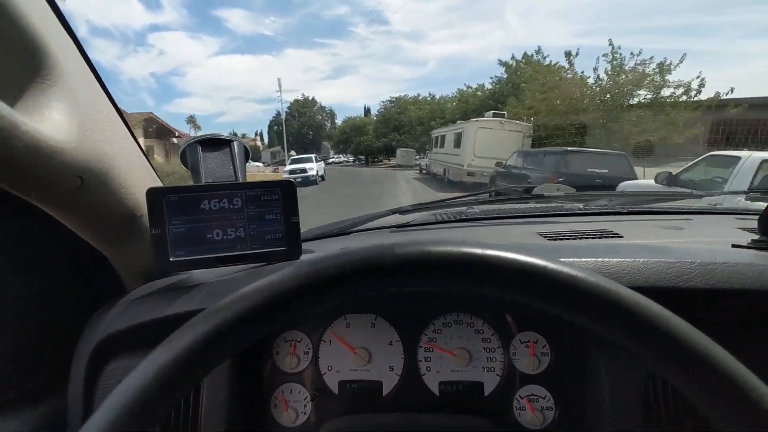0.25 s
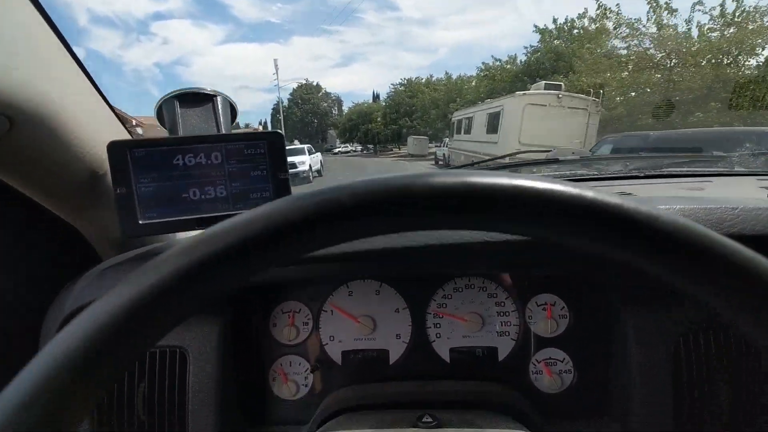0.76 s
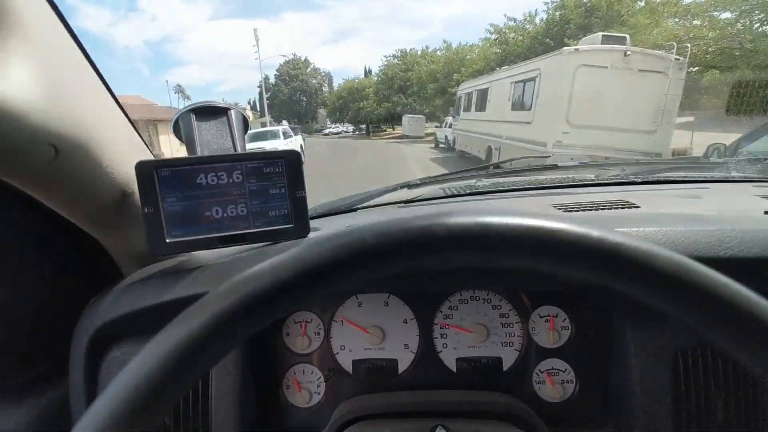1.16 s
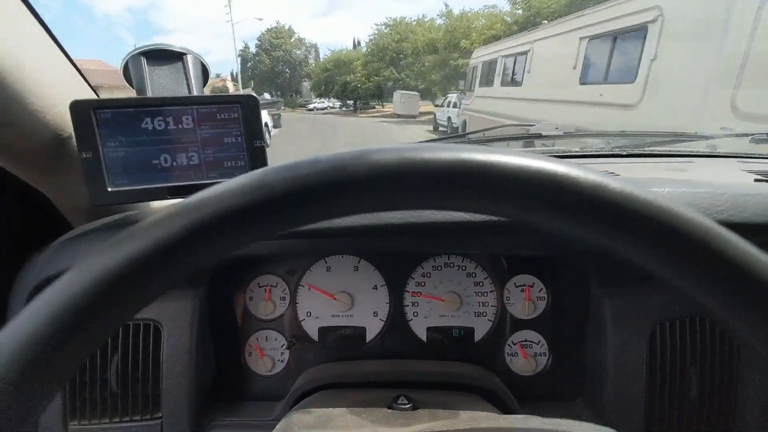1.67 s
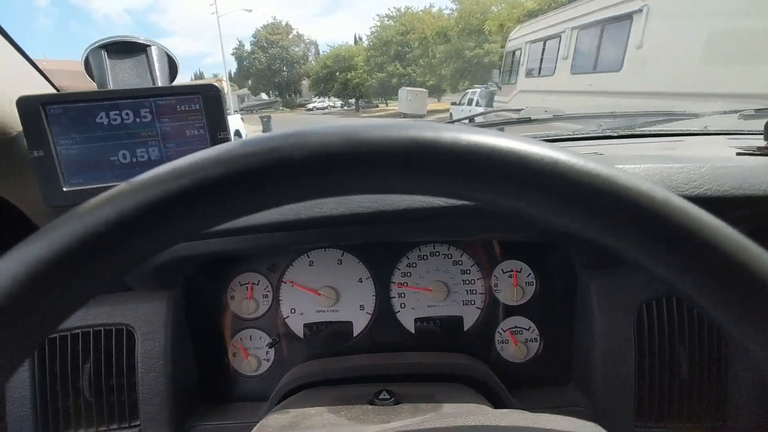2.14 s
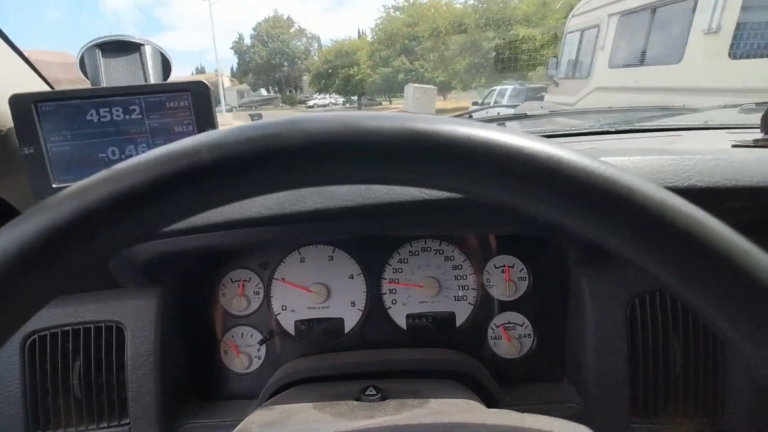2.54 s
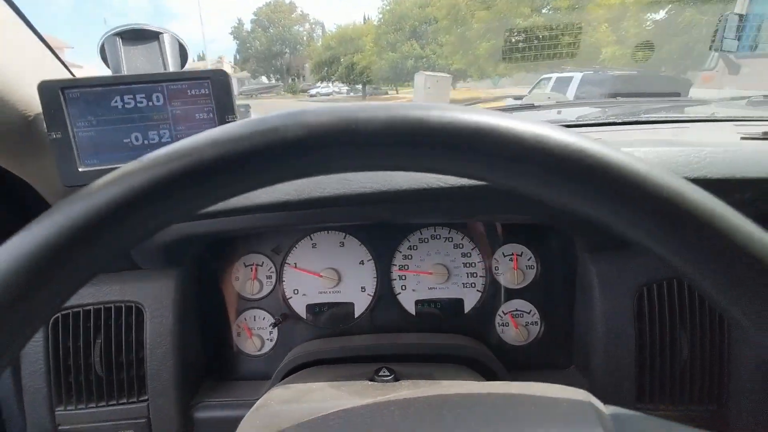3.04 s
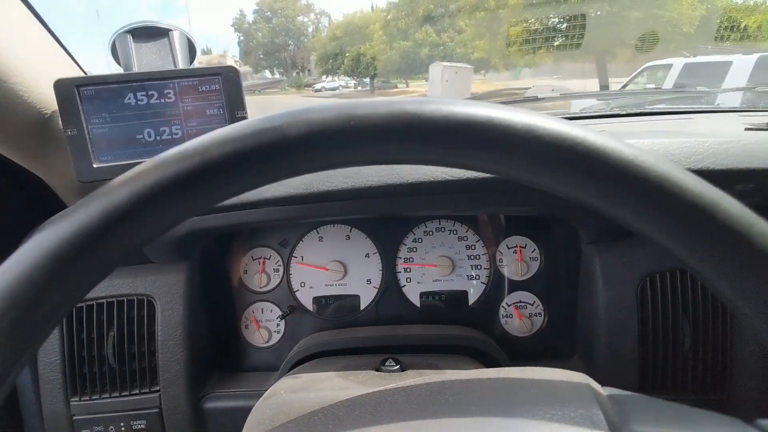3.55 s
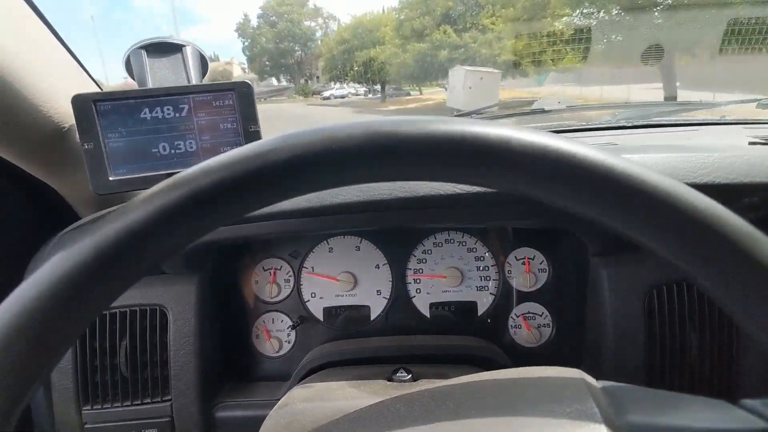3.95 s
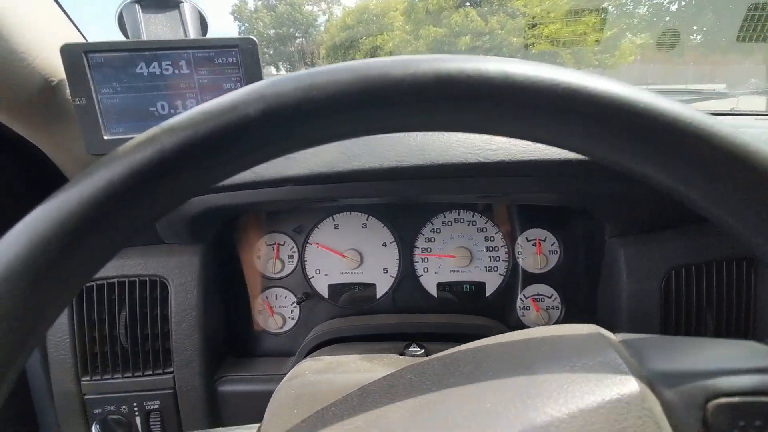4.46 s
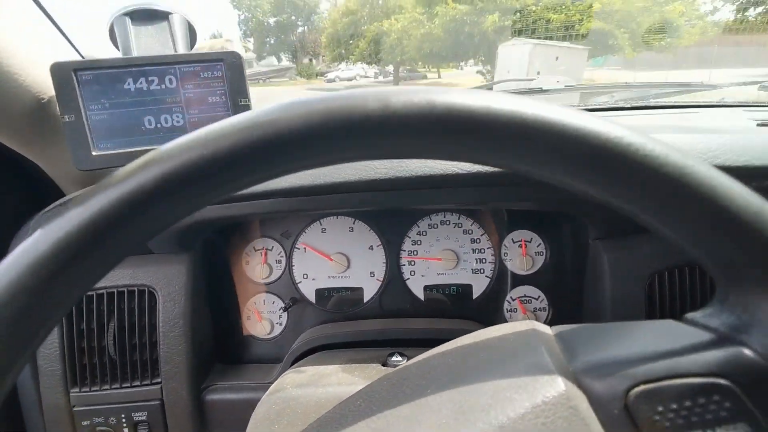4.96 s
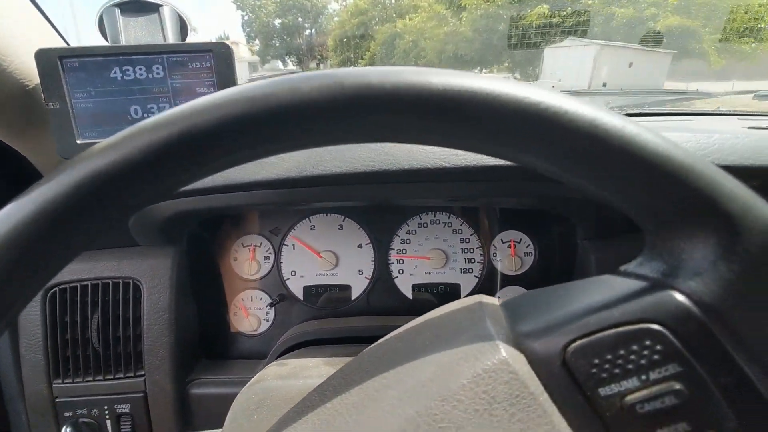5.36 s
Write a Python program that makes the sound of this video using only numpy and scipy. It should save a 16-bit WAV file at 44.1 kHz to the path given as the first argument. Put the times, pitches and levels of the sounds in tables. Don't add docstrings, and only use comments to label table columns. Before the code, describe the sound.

Close, enclosed cabin sound on a phone-like microphone. A six-cylinder diesel growls with a raspy flutter and sinks in pitch under braking, while rough road shakes the floor and loose plastic rattles. After about two seconds a crisp switch click, then a sharp puff of vented air. The drone softens briefly, and the engine picks up again, deeper and rounder, with clatter, rushing air and a thin whistle.

```python
import sys
import numpy as np
from scipy import signal
from scipy.fft import rfft, irfft, next_fast_len
from scipy.io import wavfile
from scipy.ndimage import uniform_filter1d, map_coordinates

SR = 44100
rng = np.random.default_rng(int(sys.argv[2]) if len(sys.argv) > 2 else 0)


def volts_from_decibels(level):
    exponent = np.asarray(level, float) / 20
    return 10 ** exponent


def master(y):
    cut = np.clip(np.atleast_2d(y).T, -1, 1)
    pcm = np.round(cut * 32767)
    wavfile.write(sys.argv[1], SR, pcm.astype(np.int16))


N = 246959

# time_s, firing_hz
FIRING_SPEED = [(0, 68.2), (.6, 62.65), (1, 59.4), (1.2, 56.65), (1.6, 53.2), (2, 52.15), (2.4, 49.25),
                (2.8, 46.6), (2.99, 45.9), (3.2, 42.6), (3.6, 40.7), (3.8, 42.4), (4, 45.2), (4.2, 50.3),
                (4.4, 54), (4.6, 55.9), (5.18, 64.7), (5.6, 68.4)]
# time_s, shut_0_to_1
BRAKE_VALVE = [
    (0, 1),
    (2.99, 1),
    (3.03, .1),
    (3.15, .15),
    (3.28, .45),
    (3.36, 0),
    (5.6, 0),
]
# time_s,
# flow_0_to_1
AIR_FLOW = [(0, .02), (2.4, 0), (2.7, 0.37), (3.2, 0.65), (3.5, 0.86), (4.2, 0.92), (4.9, 0.95),
            (5.1, 0.71), (5.6, 0.71)]
# freq_hz, level_db
PIPE_SHUT = [(30, -55), (70, -38), (100, -38), (130, -38), (160, -24), (180, -21), (200, -25), (225, -42),
             (255, -42), (275, -32), (298, -27), (322, -28), (345, -44), (450, -62)]
# freq_hz, level_db
PIPE_OPEN = [(30, -55), (65, -32), (100, -33), (140, -36), (205, -35), (235, -44), (300, -49), (350, -54),
             (450, -62)]
# freq_hz, lag_rad
PIPE_LAG = [(65, 0), (95, 2.5), (120, 3.1), (160, 2.8), (180, 3.3), (200, 4.3), (250, 7.5), (300, 10),
            (350, 14), (520, 20)]
# centre_hz, half_width_hz, level_db
BOOM_SHUT = [(45, 30, -49), (61.76, 2.86, -21), (85.2, 12.5, -27.5), (133.6, 6.6, -28.5),
             (147.6, 6.7, -26.5), (180.6, 18.6, -20), (264, 45, -35)]
# centre_hz, half_width_hz, level_db
BOOM_OPEN = [(65.05, 4.64, -10), (93.6, 17.8, -22), (126, 3.3, -30.5), (174.4, 19.5, -17), (221, 6.4, -9.5),
             (258, 13, -21)]
FIRING_SHUT_DB = [-0.5, -0.7, 2.4, -6.5]
FIRING_OPEN_DB = [-0.3, 1.8, -4.5, -13.5]
# centre_hz, half_width_hz, level_db
BELT_SHUT = [(280.5, 20, -28.5), (233.5, 18, -34)]
# centre_hz, half_width_hz, level_db
BELT_OPEN = [(181, 4, -36), (238.4, 37, -29)]
# middle_s, half_length_s,
# floor_shake_db, trim_rustle_db
ROUGH_ROAD = [(0.195, 0.68, 6, 1.1), (1.04, 0.16, 8, 6.5), (1.475, 0.22, 10.5, 4.5), (1.812, 0.16, 7.5, 6),
              (2.86, 0.43, 5, 4), (3.293, 0.23, 2.5, -1.1), (3.71, 0.17, 0.5, 4.5), (4.154, .12, 2.5, 3),
              (4.716, 0.52, 7.5, 1.2), (5.35, 0.42, -0.4, -3.5)]
# freq_hz, density_db_per_hz
RUMBLE_COLOUR = [(12, -45), (20, -12.5), (67, 7.5), (114, 0), (185, 12.5), (203, -2), (248, -0.5),
                 (449, -13.5), (500, -22), (650, -57), (1100, -120)]
# freq_hz, density_db_per_hz
CLATTER_COLOUR = [(180, -9.5), (300, -4.5), (458, -13), (505, -4.5), (627, -8), (762, -5), (877, -7.5),
                  (1230, -8), (1910, -28), (2770, -24), (3400, -26), (4000, -25), (5200, -26.5),
                  (8800, -120)]
# freq_hz, density_db_per_hz
HISS_COLOUR = [(880, -47), (1500, -0.5), (1710, -1.5), (2580, -3.5), (3230, -11), (4150, -8.5),
               (5600, -12.5), (6140, -11), (9630, -16.5), (11000, -21.5), (14300, -55), (22000, -120)]
# freq_hz, density_db_per_hz
WINDOW_COLOUR = [(6470, -20), (11000, -8.5), (12700, -8), (15100, -10), (15600, -15.5)]
# time_s, whistle_hz
TURBO_PITCH = [(0, 4420), (3.1, 4390), (3.9, 4610), (4.8, 4910), (5.6, 4980)]
# start_s, level_db, pitch_hz, t60_s
SQUEAKS = [(.228, -62, 12000, .03), (.314, -62, 12000, 0.028), (.803, -47, 11900, .03),
           (1.097, -37, 8300, 0.025), (1.69, -51, 14900, .05), (2.18, -57, 14900, .03),
           (3.466, -81, 9700, 0.034), (3.945, -46, 10200, 0.035)]
# start_s, peak_db, centre_hz, t60_s
KNOCKS = [(.316, -28.5, 900, 0.057), (.805, -22, 1100, 0.023), (.415, -38, 1500, .04),
          (.985, -22.5, 2500, 0.023), (.999, -29, 1090, 0.054), (1.061, -28, 930, 0.055),
          (1.03, -46, 2000, .06), (1.09, -36, 2200, .06), (1.133, -28, 800, 0.05), (1.568, -29, 830, 0.036),
          (2.196, -41, 900, .04), (2.523, -28.5, 2500, 0.023), (2.913, -31, 1540, 0.035),
          (2.97, -34, 880, .1), (3.243, -26.5, 1980, 0.043), (4.984, -42, 700, 0.045),
          (5.489, -39, 700, .05)]
# start_s, peak_db, centre_hz, t60_s
TICKS = [(.985, -39.5, 7360, 0.06), (1.098, -58, 8400, 0.045), (1.435, -52, 6000, 0.017),
         (1.575, -43, 6300, 0.15), (1.69, -40, 6500, 0.045), (1.702, -34.5, 7040, 0.034),
         (1.73, -47, 7000, 0.052), (1.809, -39.5, 11000, 0.038), (2.237, -39.5, 7960, 0.043),
         (2.663, -38.5, 8000, 0.034), (3.207, -34, 7000, 0.045), (3.466, -33.5, 6500, 0.032),
         (3.874, -34, 6500, 0.054), (3.945, -44, 9500, 0.033), (4.13, -40, 9000, 0.044),
         (4.198, -40.5, 9400, 0.046), (5.106, -52, 5030, .03)]
# start_s, level_db, pitch_hz, t60_s
BUMPS = [(1.074, -29, 393, 0.13), (1.271, -29, 384, .15), (1.385, -27, 590, 0.08), (1.425, -14, 64, 0.15),
         (1.53, -26.5, 893, 0.036), (2.789, -29.5, 419, 0.16), (2.958, -22.5, 343, 0.071),
         (4.45, -28, 980, .06), (4.66, -29, 578, 0.15)]
# start_s, level_db
SWITCH_HITS = [
    (2.1222, -20),
    (2.1246, -15.5),
    (2.1285, -30),
    (2.133, -20),
    (2.139, -39),
    (2.143, -35),
]
# freq_hz, level_db, t60_s
SWITCH_MODES = [(770, 0, .035), (1620, -4, .025), (2401, -9, .02), (3090, -10, .02), (4716, -16, .014),
                (7500, -20, .012)]
# start_s, rise_s, hold_s, fall_db_per_s, level_db
VENT_BURSTS = [
    [(2.822, 0.013, 0.11, 112, -42.5), (2.965, 0.013, 0.0085, 103, -42)],
    [(2.76, 0.021, 0.22, 200, -47), (2.935, 0.022, 0.008, 169, -35.5)],
    [(2.82, 0.037, 0.33, 200, -47.5), (2.985, .035, .01, 120, -53)],
]
# freq_hz, density_db_per_hz
JET_COLOUR = [(2650, -35), (4500, -15), (4920, -9), (5800, -7), (6960, 0.5), (8050, -9.5), (9460, -6),
              (14700, -18), (15600, -19)]
# freq_hz, density_db_per_hz
PUFF_COLOUR = [(1200, -40), (2100, -8), (2500, 0), (4000, -1), (6000, -4), (8000, -10), (12000, -24),
               (16000, -40)]
# freq_hz, density_db_per_hz
TAIL_COLOUR = [(3500, -50), (5000, -17), (5700, 3), (6600, -3), (7600, -1), (9000, -34), (12000, -60)]


def unit(x):
    return x / np.sqrt(np.mean(x ** 2) + 1e-20)


def along(points, hz):
    f, v = np.transpose(points)
    return np.interp(np.log(hz + 1), np.log(f + 1), v)


def curves(rows):
    s, *cols = np.transpose(rows)
    return [np.interp(np.arange(N) / SR, s, c) for c in cols]


def wobble(rate_hz):
    knots = rng.standard_normal(400)
    return map_coordinates(knots, [np.arange(N) * rate_hz / SR], order=1)


def rush(spectrum, patchy_db):
    z = signal.stft(rng.standard_normal(N), nperseg=512)[2]
    field = uniform_filter1d(rng.standard_normal(z.shape), size=6, axis=0)
    field = uniform_filter1d(field, size=12, axis=1)
    x = signal.istft(z * volts_from_decibels(patchy_db * unit(field)), nperseg=512)[1][:N]
    m = next_fast_len(N + 8192)
    gain = volts_from_decibels(along(spectrum, np.fft.rfftfreq(m, 1 / SR)))
    return unit(irfft(rfft(x, m) * gain, m)[:N])


def resonant(peaks, hz):
    return 10 * np.log10(sum((volts_from_decibels(db) / (1 + ((hz - c) / w) ** 2)) ** 2 for c, w, db in peaks))


def patches():
    s, half, *gains_db = np.transpose(ROUGH_ROAD)
    swell = np.exp(-((np.arange(N)[:, None] / SR - s) / half) ** 2)
    return [swell @ g for g in gains_db]


def body_level(rest_db, flow_gain_db, rustle_share):
    flow, = curves(AIR_FLOW)
    return rest_db + flow_gain_db * flow ** 2 + rustle_share * patches()[1]


def narrow_air(pitch_hz, level_db, width_hz):
    phase = 2 * np.pi * np.cumsum(pitch_hz) / SR
    blur = [(20, 0), (width_hz, -5), (3 * width_hz, -22), (20000, -120)]
    band = rush(blur, 0.94) * np.cos(phase) + rush(blur, 0.72) * np.sin(phase)
    return volts_from_decibels(level_db + 1.8 * wobble(25)) * band


def strike(events):
    out = np.zeros(N + SR)
    for s, sound in events:
        out[round(s * SR):][:len(sound)] += sound
    return out[:N]


def ring_time():
    t = np.arange(SR // 4) / SR
    return t, 1 - np.exp(-t / .0012)


def exhaust(firing_hz, cam_rad):
    fuel_s, fuel_rise_s, coast_db = 3.03, 1.18, -13.5
    even_from_hz, evening_db_per_hz = 50, .3
    soft_below_hz, softening_db_per_hz = 53, .9
    uneven_db, turn_db = -12, -18
    strong_at_cycle, scatter = 2 / 3, .15
    shut, = curves(BRAKE_VALVE)
    fuel_db = coast_db * np.clip(1 - (np.arange(N) / SR - fuel_s) / fuel_rise_s, 0, 1)

    def heard(hz, closed, opened):
        return shut ** 2 * resonant(closed, hz) + (1 - shut ** 2) * (resonant(opened, hz) + fuel_db)

    belt_db = heard(25.7 * firing_hz / 6, BELT_SHUT, BELT_OPEN)
    out = volts_from_decibels(belt_db + 3 + 1.5 * wobble(6)) * np.cos(25.7 * cam_rad + .4 * wobble(5))
    even_db = evening_db_per_hz * np.maximum(firing_hz - even_from_hz, 0)
    soft_db = shut * softening_db_per_hz * np.maximum(soft_below_hz - firing_hz, 0)
    for order in range(1, 49):
        drift, slip, start_rad = wobble(5), wobble(4), rng.uniform(0, 2 * np.pi)
        hz = order * firing_hz / 6
        late = order * cam_rad - along(PIPE_LAG, hz)
        pipe_db = shut * along(PIPE_SHUT, hz) + (1 - shut) * along(PIPE_OPEN, hz) + 3
        pipe_db -= .4 * max(order - 27, 0)
        if 27 <= order < 36:
            pipe_db -= soft_db
        if order in (6, 12, 18, 24):
            k = order // 6 - 1
            level_db = heard(hz, BOOM_SHUT, BOOM_OPEN) + 3 + .8 * drift
            level_db += shut * FIRING_SHUT_DB[k] + (1 - shut) * FIRING_OPEN_DB[k]
            phase = late + .15 * slip
        elif order % 6 == 3:
            level_db = pipe_db + 1.2 * drift
            phase = late + .2 + 1.2 * (1 - shut) + .3 * slip
        else:
            once_a_cycle = bool(order % 2 or order % 6 == 0)
            single_db = uneven_db + 4 * (order > 27) if once_a_cycle else turn_db
            level_db = pipe_db + single_db - (1 - shut * once_a_cycle) * even_db + 2 * drift
            phase = late - 2 * np.pi * strong_at_cycle * order
            phase = phase + scatter * (start_rad - np.pi) + .35 * slip
        out += volts_from_decibels(level_db) * np.cos(phase)
    return out


def road_rumble():
    lumps = volts_from_decibels(wobble(6.6))
    return volts_from_decibels(-30.5 + patches()[0]) * lumps * rush(RUMBLE_COLOUR, patchy_db=-1.96)


def diesel_clatter(cam_rad):
    knock = 1 + .25 * np.cos(6 * cam_rad) + .1 * np.cos(3 * cam_rad)
    clatter = unit(knock * rush(CLATTER_COLOUR, patchy_db=-0.94))
    return volts_from_decibels(body_level(-41.5, 6.56, 0.37) + .9 * wobble(7.5)) * clatter


def air_hiss():
    gusts = volts_from_decibels(1.2 * wobble(10) + .9 * wobble(40))
    hiss = volts_from_decibels(body_level(-48.5, 6, 0.78)) * rush(HISS_COLOUR, patchy_db=2.2)
    window = volts_from_decibels(body_level(-65.5, 2, 0.61)) * rush(WINDOW_COLOUR, patchy_db=1.2)
    return gusts * (hiss + window)


def intake_air():
    whistle_hz, = curves(TURBO_PITCH)
    flow, = curves(AIR_FLOW)
    intake_db = -66.5 + 17.8 * flow
    steady = np.ones(N)
    out = narrow_air(2750 * steady, intake_db + 6, width_hz=400)
    out += narrow_air(.5 * whistle_hz + 5300, intake_db - 6.5, width_hz=700)
    out += narrow_air(10000 * steady, intake_db - 16, width_hz=600)
    return out + narrow_air(1400 * steady, intake_db + 7, width_hz=250)


def single_rings(rows):
    t, _ = ring_time()
    return strike([(s, volts_from_decibels(db + 5 - 60 * t / t60) * (1 - np.exp(-15 * t / t60)) * np.sin(2 * np.pi * hz * t))
                   for s, db, hz, t60 in rows])


def trim_rattles(rows, width, gain_db):
    t, onset = ring_time()
    events = []
    for s, db, hz, t60 in rows:
        edges_hz = np.clip([hz * (1 - width), hz * (1 + width)], 100, 15000)
        band = signal.butter(3, edges_hz, "band", fs=SR, output="sos")
        burst = unit(signal.sosfilt(band, rng.standard_normal(len(t))))
        events.append((s, volts_from_decibels(db + gain_db - 60 * t / t60) * onset * burst))
    return strike(events)


def switch_snap():
    t, onset = ring_time()
    events = []
    for s, db in SWITCH_HITS:
        ring = sum(volts_from_decibels(g + rng.normal(0, 2) - 60 * t / t60) * np.sin(2 * np.pi * hz * t)
                   for hz, g, t60 in SWITCH_MODES)
        crack = signal.lfilter([.05, .05], [1, -1.35, .45], rng.standard_normal(len(t)))
        events.append((s, volts_from_decibels(db) * (onset * ring + 1.9 * volts_from_decibels(-60 * t / .016) * crack)))
    return strike(events)


def valve_vent():
    t = np.arange(N) / SR
    out = np.zeros(N)
    for rows, colour in zip(VENT_BURSTS, (JET_COLOUR, PUFF_COLOUR, TAIL_COLOUR)):
        level = np.zeros(N)
        for s, rise, hold, fall, db in rows:
            opening = np.clip((t - s) / rise, 0, 1) ** 2
            level += opening * volts_from_decibels(db - fall * np.clip(t - s - rise - hold, 0, 1))
        out += level * rush(colour, patchy_db=-3.1)
    return out


def turbo_whistle():
    start_s, rise_s, silent_db, fade_db_per_s = 3.0, 0.23, -30, 1.6
    whistle_hz, = curves(TURBO_PITCH)
    since_s = np.arange(N) / SR - start_s
    level_db = -48.5 + silent_db * np.clip(1 - since_s / rise_s, 0, 1)
    level_db -= fade_db_per_s * since_s.clip(0)
    return narrow_air(whistle_hz, level_db, width_hz=200)


def scene():
    firing_hz, = curves(FIRING_SPEED)
    cam_rad = 2 * np.pi * np.cumsum(firing_hz / 6) / SR
    mix = exhaust(firing_hz, cam_rad) + road_rumble()
    mix += diesel_clatter(cam_rad) + air_hiss() + intake_air()
    mix += single_rings(SQUEAKS)
    mix += trim_rattles(KNOCKS, width=.55, gain_db=-2.5)
    mix += trim_rattles(TICKS, width=.3, gain_db=-1.5)
    mix += single_rings(BUMPS)
    mix += switch_snap() + valve_vent() + turbo_whistle()
    return mix[None]


def roll_off(x):
    return signal.sosfilt(signal.butter(12, 15730, fs=SR, output="sos"), x)


def record(dry):
    top_hz = 15730
    mix = irfft(rfft(dry) * (np.fft.rfftfreq(N, 1 / SR) < top_hz), N)
    return roll_off(mix)


dry = scene()
out = record(dry)
master(out)
```